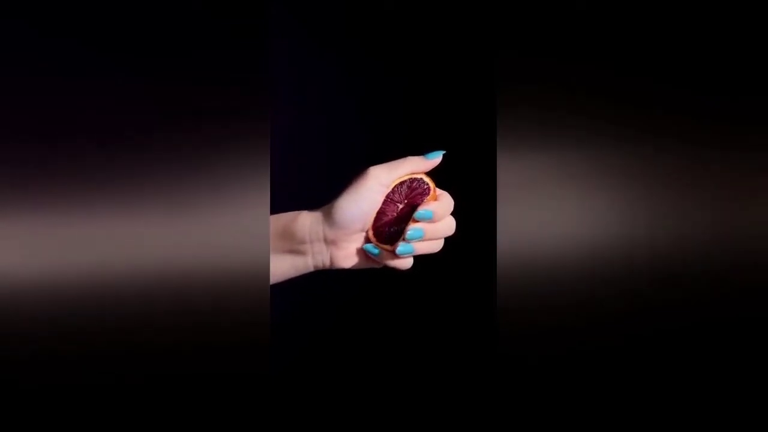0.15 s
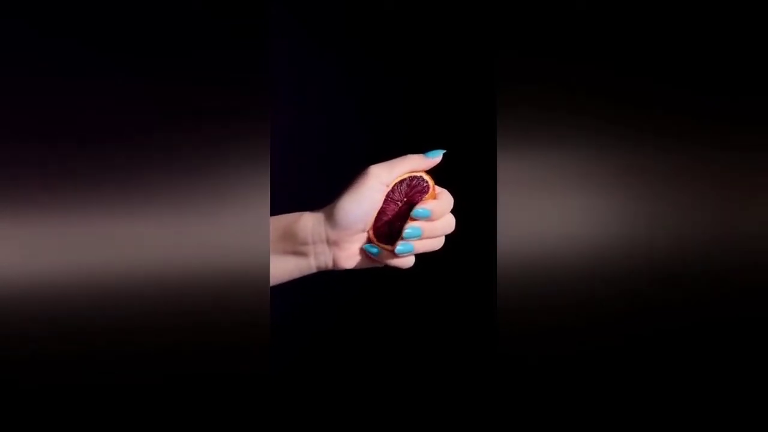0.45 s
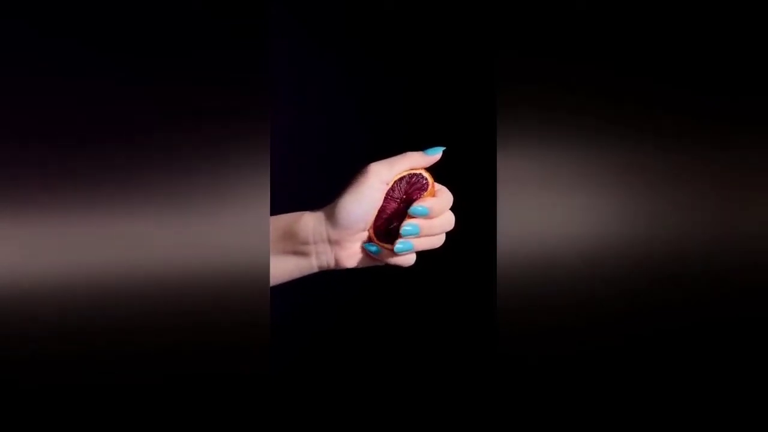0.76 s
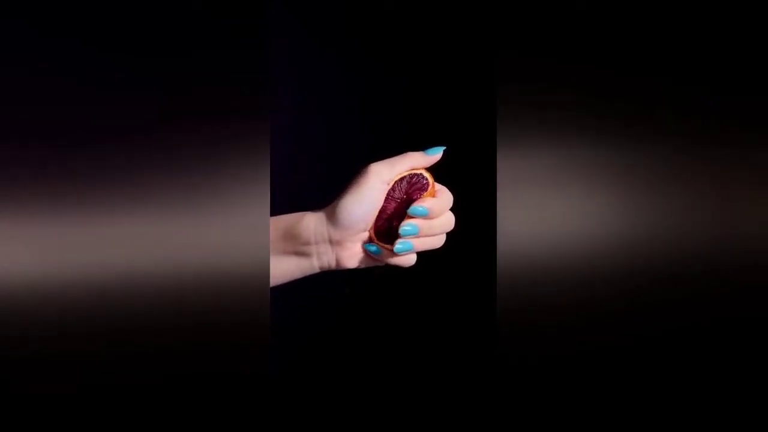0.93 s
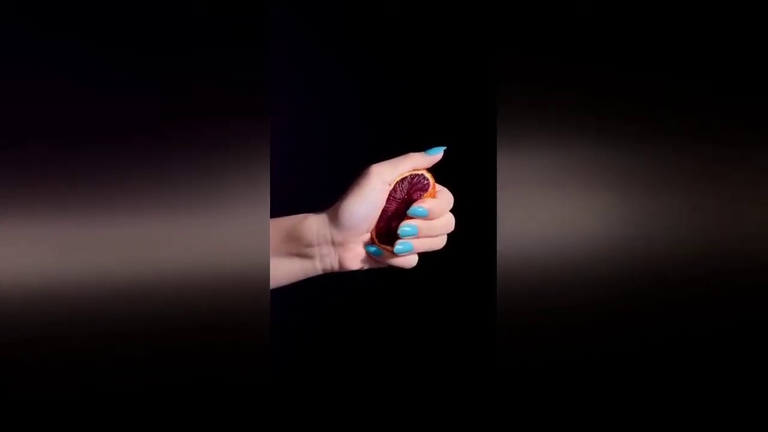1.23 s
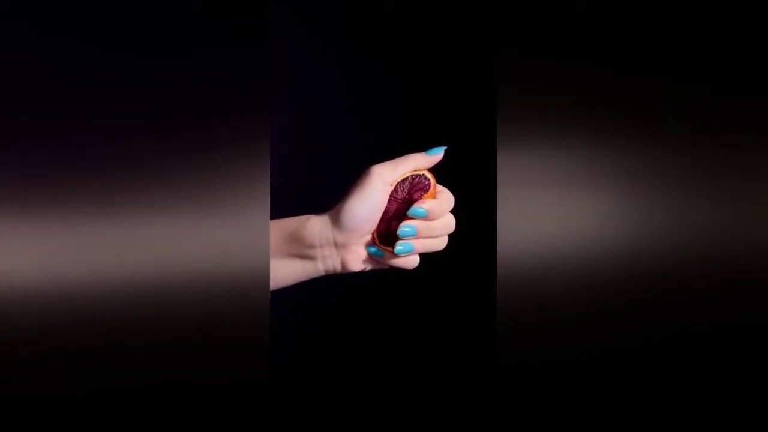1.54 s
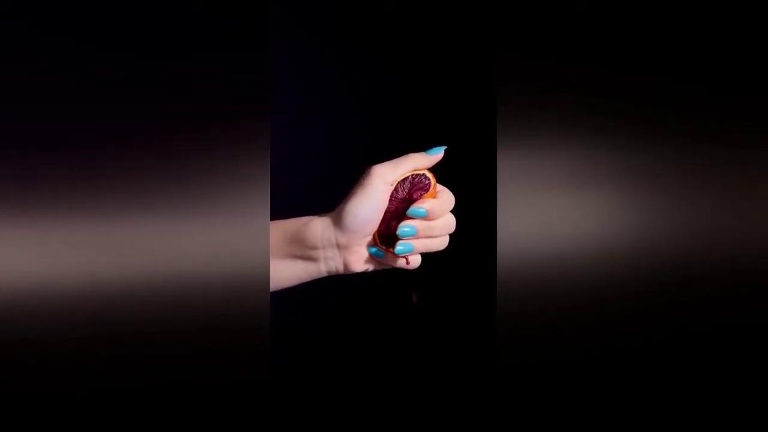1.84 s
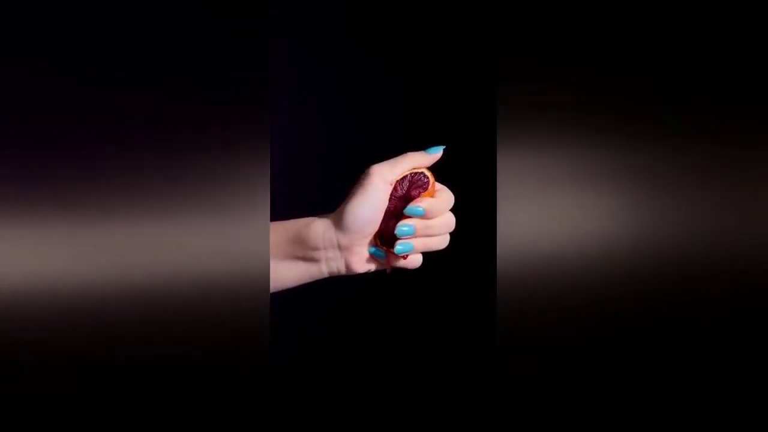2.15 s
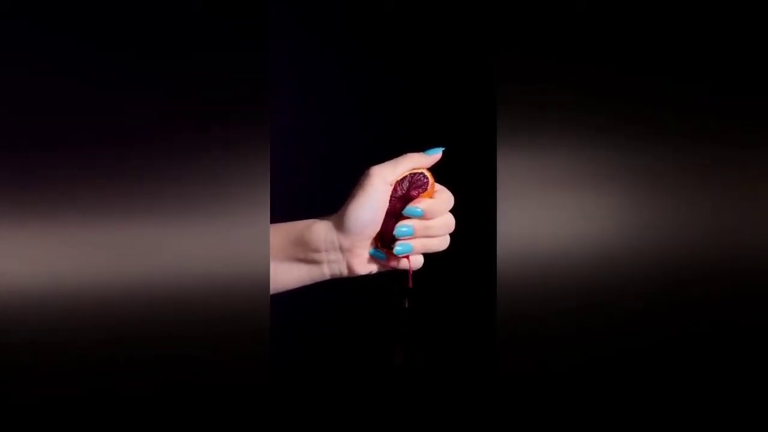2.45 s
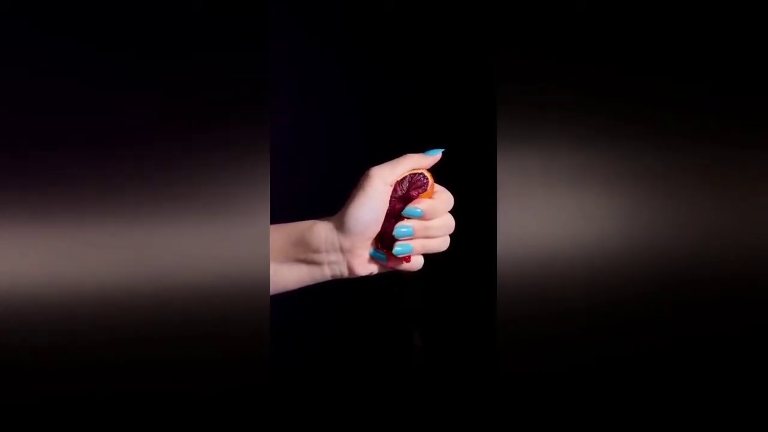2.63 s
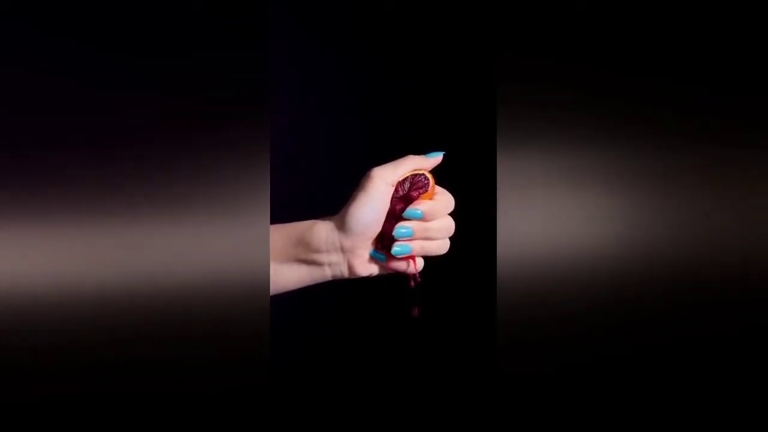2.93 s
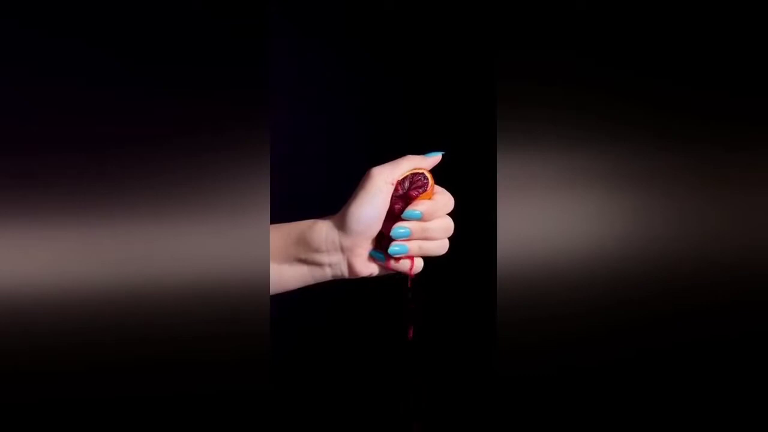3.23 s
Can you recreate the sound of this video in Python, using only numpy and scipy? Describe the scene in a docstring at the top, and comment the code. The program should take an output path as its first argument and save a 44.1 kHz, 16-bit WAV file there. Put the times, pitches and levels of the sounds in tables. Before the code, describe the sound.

A hand squeezes juicy fruit close by: wet crackle, bright snapping pops, fizz, low gurgling juice

```python
"""Pulp crackles as it tears, then sharp wet pops burst over it: a hand crushes half a blood orange
close by in a dead, quiet room. Pops and crackle are random clicks that ring small resonances.
Fine bubbles make the fizz of juice. Later juice gurgles through an air pocket in the fist, squirts
out between the fingers, and a last sac bursts. Soft thuds and a faint room tone lie beneath."""
import sys
import numpy as np
from scipy import signal
from scipy.fft import rfft, irfft
from scipy.io import wavfile

SR = 44100
rng = np.random.default_rng(int(sys.argv[2]) if len(sys.argv) > 2 else 0)


def digitize_waveform(pressure):
    """Quantize a signal to 16-bit integers and store it at the path in sys.argv[1].

    Rows of a 2-D input are taken as channels; values are limited to [-1, 1].
    """
    field = np.atleast_2d(pressure).T
    bounded = np.clip(field, -1, 1)
    quanta = np.round(bounded * 32767).astype(np.int16)
    wavfile.write(sys.argv[1], SR, quanta)


N = 147735
TIME = np.arange(N) / SR  # seconds
LEVEL_WINDOW_S = .005  # a short sound's level spreads its energy over this time
FIZZ_PIVOT_HZ = 8100  # brightness tilts about this pitch


def from_db(db):
    """Turn decibels into a gain."""
    return 10 ** (np.asarray(db) / 20)


def rms_one(x):
    """Scale a sound to an average (RMS) level of 1."""
    return x / np.sqrt(np.mean(x ** 2) + 1e-20)


def in_time(rows):
    """Join the points of each column by straight lines over the whole scene."""
    seconds, *columns = np.transpose(rows)
    return [np.interp(TIME, seconds, column) for column in columns]


def during(rows):
    return (TIME > rows[0][0]) & (TIME < rows[-1][0])


def at_hz(points, hz):
    """Read a spectrum in dB, with pitch on a logarithmic axis."""
    points_hz, points_db = np.array(points).T
    return np.interp(np.log(hz + 1e-9), np.log(points_hz), points_db)


def drift(per_s):
    """A slow random curve: per_s random points a second, joined by straight lines."""
    knots = rng.standard_normal(N // 20)
    return np.interp(TIME * per_s, np.arange(len(knots)), knots)


def band(x, low_hz, high_hz):
    """Keep a band of pitches with gentle edges."""
    edges_hz = [min(low_hz, high_hz / 2), min(high_hz, SR / 2 - 1000)]
    return signal.sosfilt(signal.butter(2, edges_hz, "band", fs=SR, output="sos"), x)


def ring(x, hz, q):
    """A fixed resonance; a higher q rings longer."""
    b, a = signal.iirpeak(min(hz, SR / 2 - 1000), max(q, 4 * hz / SR), fs=SR)
    return signal.lfilter(b, a, x + 1e-18)


def moving_ring(x, hz, width_hz):
    """A steep-sided resonance whose pitch can move, at unit level."""
    turn = np.exp(2j * np.pi * np.cumsum(hz + 0 * TIME) / SR)
    r = np.exp(-np.pi * width_hz / SR)
    # shift the moving pitch down to 0 Hz, smooth there, then shift back up
    smoothed = signal.lfilter([1], [1, -2 * r, r * r], x / turn + 1e-18)
    return rms_one((smoothed * turn).real)


def clicks(per_s, spread_db, size=N):
    """Random clicks: a few stand out as larger, or as smaller if the spread is negative."""
    sizes = from_db(spread_db * np.minimum(rng.exponential(1, size), 5))
    signs = rng.choice([-1, 1], size)
    return sizes * signs * (rng.random(size) < per_s / SR)


def add(out, start_s, sound, level_db):
    """Place a short sound, setting its level from its energy over the level window."""
    i = max(int(start_s * SR), 0)
    unit = sound * np.sqrt(LEVEL_WINDOW_S * SR / (np.sum(sound ** 2) + 1e-20))
    out[i:i + len(sound)] += (from_db(level_db) * unit)[:N - i]


def rupture(length_s, size=2400):
    """A membrane rips in a quick run of tears, with a faint spray that dies away."""
    attack_s, release_s, spray_db, spray_decay_s = .0004, .0023, -21, .007
    t = np.arange(size) / SR
    shape = np.minimum(t / attack_s, 1) * np.exp(-np.maximum(t - length_s, 0) / release_s)
    spray = from_db(spray_db) * np.exp(-t / spray_decay_s)
    tears = clicks(per_s=4000, spread_db=.5, size=size) + .5 * rng.standard_normal(size)
    return tears * (shape + spray)


def bursting_sacs():
    """Each rupture rings a small bubble and a smaller twin, and throws a crack and a bright spray."""
    # juice sacs that burst: start_s, pitch_hz, bubble_db, crack_db, spray_db
    # (the three levels come before the shared trims below)
    sac_bursts = [(0.2248, 3730, -20.5, -24, -40), (.254, 3200, -24.5, -23, -19),
                  (0.296, 4930, -16, -15.5, -40), (0.3274, 5300, -28, -17, -21),
                  (0.3333, 7660, -18, -13.5, -33), (0.346, 3580, -20.5, -27, -35),
                  (0.3694, 3710, -13.5, -21, -30), (0.373, 4550, -14, -12.5, -33),
                  (0.4051, 3810, -11.5, -35, -33), (.406, 10060, -10, -8, -25),
                  (0.4563, 3260, -17.5, -24, -30), (0.477, 3840, -20.5, -27, -32),
                  (.504, 3530, -13.5, -22, -25), (0.509, 3500, -11.5, -10, -9),
                  (.553, 3120, -16.5, -25, -28.7), (0.5634, 3090, -19.5, -10.5, -19),
                  (0.582, 3390, -17, -19, -39), (0.9363, 6570, -14.5, -12.5, -12),
                  (1.0179, 3870, -21, -14, -5), (1.0357, 9900, -31, -40, -26),
                  (1.0618, 5000, -19, -14, -22), (1.0651, 9870, -12.5, -11, -24),
                  (1.1308, 5800, -10, -26, -0.5), (1.2007, 6220, -12.5, -10, -2),
                  (1.2962, 8550, -27, -18, -16), (1.3156, 5000, -23.5, -19.5, -15),
                  (1.33, 6670, -22.5, -34, -38), (1.4121, 3620, -12, -12.5, -12),
                  (1.462, 6160, -8, -12, -5), (1.518, 3500, -19.5, -23, -5), (1.57, 5200, -33, -16, -6.5),
                  (1.5975, 5050, -17.5, -13.5, -10), (1.7198, 5600, -11.5, -15, -0.5),
                  (1.807, 5230, -18, -23, -28), (1.8288, 4040, -14, -11, -30), (1.8949, 5110, -14, -18, -5),
                  (1.9403, 5000, -14.5, -9, -30), (1.9908, 7650, -19.5, -20, -12),
                  (2.232, 4770, -28.5, -28, -20), (2.2657, 5000, -26.5, -32, -31),
                  (2.3147, 5930, -16.5, -19.5, -14.5), (2.928, 10950, -21, -36, -28),
                  (3.0907, 7120, -13, -14.5, -35)]
    bubble_trim_db, crack_trim_db, spray_trim_db = 1.5, -3, -13.5
    burst_s, bubble_q = .0017, 14
    crack_low_hz, crack_top_hz, spray_top_hz = 4390, 8950, 15100
    spray_low_hz = spray_top_hz / 2
    out = np.zeros(N)
    for start_s, hz, bubble_db, crack_db, spray_db in sac_bursts:
        twin_db = -7 * hz / crack_low_hz  # high twins hardly ring
        for pitch_hz, db in ((hz, 0), (hz * 1.346, twin_db)):
            bubble = ring(ring(rupture(burst_s), pitch_hz, bubble_q), pitch_hz, 1)
            add(out, start_s, bubble, bubble_db + bubble_trim_db + db)
        # a higher bubble has a higher crack
        crack = band(rupture(burst_s), crack_low_hz * np.sqrt(hz / 5000), crack_top_hz)
        add(out, start_s, crack, crack_db + crack_trim_db)
        spray = band(rupture(burst_s), spray_low_hz, spray_top_hz)
        spray = band(spray, spray_low_hz, spray_top_hz)  # twice for steeper edges
        add(out, start_s, spray, spray_db + spray_trim_db)
    return out


def grains(colour, per_s, spread_db, q, clump_db, tick_hz, tilt_db=0, count=26):
    """Tiny bubbles ring at many pitches, in clumps, with shared snaps and dry ticks; unit level."""
    snap_share = .7  # how much snaps that ring all pitches add to each pitch's own clicks
    total, power = 0, 0
    snaps = rms_one(clicks(per_s / 10, spread_db))
    clumps = from_db(clump_db * drift(110))
    for k, hz in enumerate(np.geomspace(colour[0][0], colour[-1][0], count)):
        own_clicks = rms_one(clicks(per_s / count, spread_db))
        drive = own_clicks + snap_share * (-1) ** k * snaps
        colour_db = at_hz(colour, hz) + tilt_db * np.log2(hz / FIZZ_PIVOT_HZ)
        gain = from_db(colour_db) * np.sqrt(hz)  # higher bands are wider
        total = total + gain * rms_one(ring(ring(drive, hz, q), hz, 1))
        power = power + gain ** 2
    bubbles = rms_one(total / np.sqrt(power) * clumps)
    ticks = rms_one(band(clicks(per_s=140, spread_db=2.2), tick_hz / 2, tick_hz * 2))
    return rms_one(bubbles + from_db(-8) * ticks)


def squelch():
    """Many small clicks ring as the coarse crackle of pulp and the finer fizz of pressed juice."""
    # crackle of the tearing pulp: time_s, level_db
    pulp_curve = [(0, -31.5), (.095, -33), (.28, -29), (.44, -25.5), (.53, -20), (.61, -24), (.66, -23),
                  (.71, -28), (.78, -23), (.84, -27), (.93, -26), (1.0, -36.5), (1.27, -35), (1.48, -34),
                  (1.53, -37), (1.67, -36.5), (1.78, -43.5), (2.1, -47.5), (2.6, -42), (2.85, -40.5),
                  (2.97, -52)]
    # spectrum of the crackle: pitch_hz, level_db (per Hz)
    pulp_colour = [(350, -35), (600, -15.5), (1100, -5), (1500, -8), (2300, -1), (3300, -2), (4500, -3.5),
                   (6500, -6), (9000, -25), (15000, -39)]
    # fizz of juice pressed through the pulp: time_s, level_db
    fizz_curve = [(.1, -41), (.305, -36.5), (.34, -26), (.56, -25.5), (.7, -34), (.86, -33.5), (.92, -26),
                  (.99, -39.5), (1.035, -30.5), (1.1, -35), (1.145, -18.5), (1.18, -22), (1.24, -30),
                  (1.38, -29.5), (1.425, -40), (1.478, -20.5), (1.51, -34), (1.565, -30.5), (1.66, -26),
                  (1.7, -42), (1.732, -25), (1.775, -40), (1.905, -30.5), (1.965, -37), (2.0, -28.5),
                  (2.1, -40.5), (2.28, -37.5), (2.36, -44.5), (2.65, -29), (2.745, -39), (2.78, -24),
                  (2.86, -28.5), (2.935, -34.5), (2.97, -40), (3.065, -43), (3.095, -22), (3.13, -47.5)]
    # spectrum of the fizz before the brightness tilt: pitch_hz, level_db (per Hz)
    fizz_colour = [(1500, -16), (3000, -42), (4500, -8), (6000, -2), (8000, -4), (10500, -4.5),
                   (13000, -7.5), (15500, -12)]
    # brightness of the fizz: time_s, tilt_db (per octave)
    brightness_curve = [(0, 18), (.42, -1.5), (.8, -8.5), (1.2, -4), (1.45, -6.5), (2.28, -3), (2.5, 0),
                        (2.92, 16), (3.0, -4.5)]
    [pulp_db], [fizz_db] = in_time(pulp_curve), in_time(fizz_curve)
    [tilt_db] = in_time(brightness_curve)
    pulp = grains(pulp_colour, per_s=2700, spread_db=2, q=7.2, clump_db=2.2, tick_hz=3840)
    fizz = grains(fizz_colour, per_s=5500, spread_db=-.5, q=3.1, clump_db=4,
                  tick_hz=FIZZ_PIVOT_HZ, tilt_db=tilt_db)
    return from_db(pulp_db) * pulp + from_db(fizz_db) * fizz


def gurgle():
    """Breaking films of juice ring a pocket whose pitch sinks, and a broad resonance above it."""
    # juice in the air pocket: time_s, pitch_hz, pocket level_db, upper resonance level_db
    gurgle_curve = [(1.99, 1130, -45, -36), (2.02, 1110, -30.5, -42), (2.066, 1160, -33.5, -44),
                    (2.1, 1130, -62, -70), (2.135, 1150, -29.5, -45.5), (2.178, 1114, -31, -35.5),
                    (2.21, 1130, -53, -56), (2.25, 1100, -43, -44), (2.33, 1054, -43.5, -42),
                    (2.53, 903, -33, -30.5), (2.67, 870, -35.5, -32.5), (2.73, 820, -37.5, -45),
                    (2.85, 830, -41, -40), (2.89, 800, -53, -52), (3.35, 746, -51, -56)]
    width_hz, upper_hz, upper_width_hz = 170, 2370, 1700
    hz, level_db, upper_db = in_time(gurgle_curve)
    films = clicks(per_s=1000, spread_db=3)
    # the pitch shakes most where it is highest
    highness = (hz - hz.min()) / np.ptp(hz)
    flutter = 1 + .095 * drift(160) * highness ** 2
    pocket = moving_ring(films, hz * flutter, width_hz)
    pocket = rms_one(band(pocket, hz.min() - width_hz / 2, upper_hz))
    upper = moving_ring(films, upper_hz, upper_width_hz)
    upper = rms_one(band(upper, upper_hz / 2, upper_hz + upper_width_hz))
    return during(gurgle_curve) * (from_db(level_db) * pocket + from_db(upper_db) * upper)


def squirt():
    """Sputtering juice, as random clicks, rings a narrow gap in two spurts."""
    # juice through the gap: time_s, pitch_hz, level_db
    squirt_curve = [(2.772, 8160, -55), (2.788, 7860, -15), (2.805, 9700, -23), (2.822, 7940, -31),
                    (2.83, 7500, -7.5), (2.84, 7000, -18), (2.854, 7500, -24), (2.872, 7940, -28)]
    hz, level_db = in_time(squirt_curve)
    sputter = clicks(per_s=830, spread_db=2.7)
    return during(squirt_curve) * from_db(level_db) * moving_ring(sputter, hz, width_hz=930)


def air_pockets():
    """Larger pockets rip open, each with a hollow ring and a smack."""
    # pockets that open: start_s, length_s, pitch_hz, ring_db, smack_db (levels before the trims)
    pocket_plops = [(1.661, 0.01, 1290, -21, -21.5), (2.019, 0.0076, 1160, -19, -24),
                    (2.023, 0.0037, 124, -32.5, -34), (2.2435, 0.00057, 2290, -27.5, -18.5),
                    (2.461, 0.00069, 2000, -23, -38), (2.481, 0.0081, 984, -26, -21),
                    (2.528, 0.0023, 970, -24.5, -20.5), (2.5523, 0.0015, 2630.0, -20, -29),
                    (2.766, 0.00045, 2000, -29.5, -33), (3.004, 0.00093, 850, -50, -29.5),
                    (3.089, 0.0057, 786, -29, -17), (3.191, 0.0082, 570, -42.5, -29.5),
                    (3.265, 0.0088, 770, -38.5, -36)]
    ring_trim_db, smack_trim_db = -.5, -5.5
    out = np.zeros(N)
    for start_s, length_s, hz, ring_db, smack_db in pocket_plops:
        hollow = ring(ring(rupture(length_s), hz, 5.9), hz, .68)
        add(out, start_s, hollow, ring_db + ring_trim_db)
        smack = band(rupture(length_s), 840, 3220)
        add(out, start_s, smack, smack_db + smack_trim_db)
    return out


def flesh(size=4000):
    """The flesh gives way in soft thuds: low noise that dies away very fast."""
    # thuds: start_s, level_db, top_hz
    flesh_thuds = [(0.406, -30.5, 656), (1.13, -24, 810), (1.465, -28.5, 660), (3.092, -34.5, 700)]
    low_hz, decay_s = 60.5, .002
    out, t = np.zeros(N), np.arange(size) / SR
    for start_s, level_db, top_hz in flesh_thuds:
        noise = rng.standard_normal(size) * np.exp(-t / decay_s)
        add(out, start_s, band(noise, low_hz, top_hz), level_db)
    return out


def room_tone():
    """Shaped noise gives a faint rumble and hiss that waver together."""
    # spectrum of the room: pitch_hz, level_db (per Hz, before the overall level)
    room_colour = [(40, -13), (70, -6.5), (125, 3), (190, -6.5), (420, -7), (900, -2.5), (2000, -19.5),
                   (15000, -18)]
    level_db, waver_db, waver_per_s = -45, 5, 14
    gain = from_db(at_hz(room_colour, np.fft.rfftfreq(N, 1 / SR)))
    noise = irfft(rfft(rng.standard_normal(N)) * gain, N)
    return from_db(level_db) * rms_one(noise * from_db(waver_db * drift(waver_per_s)))


def scene():
    """The fruit arrives twice, weaker copy first, as from two mixed microphones: a hollow colour."""
    gap_s, early_share, side_db = 81 / 44100, .53, -37
    fruit = bursting_sacs() + squelch() + gurgle() + squirt() + air_pockets() + flesh()
    lag = round(gap_s * SR)
    early = np.pad(fruit[lag:], (0, lag))
    mid = fruit + early_share * early + room_tone()
    # a faint quarter-turn copy of the sound makes left and right differ slightly
    side = from_db(side_db) * signal.hilbert(mid).imag
    return np.array([mid + side, mid - side])


def record(dry):
    """Round off the loudest pops, then cut the top of the treble."""
    ceiling, cutoff_hz = .95, 15400
    rounded = dry / (1 + (dry / ceiling) ** 4) ** (1 / 4)
    return signal.sosfilt(signal.ellip(10, .1, 80, cutoff_hz, fs=SR, output="sos"), rounded)


dry = scene()
out = record(dry)
digitize_waveform(out)
```